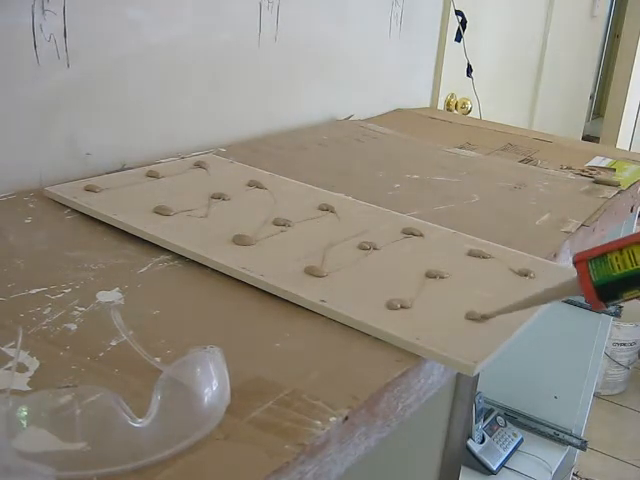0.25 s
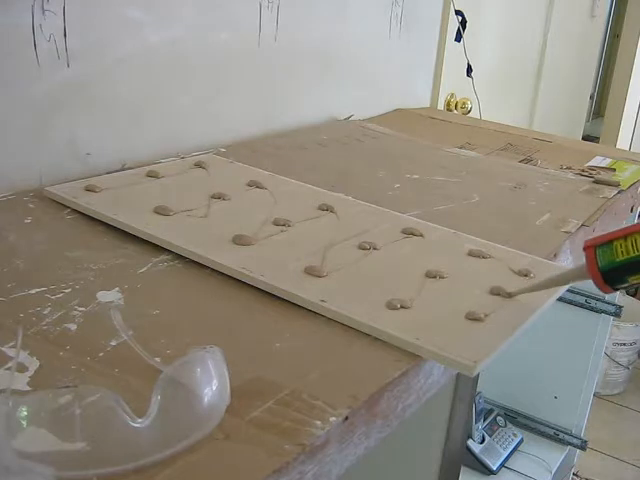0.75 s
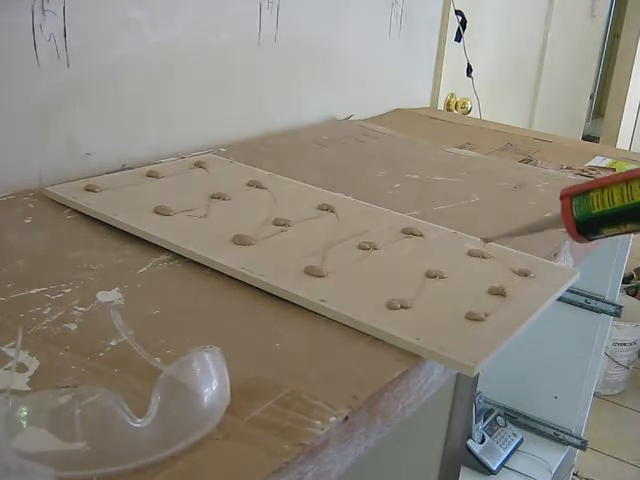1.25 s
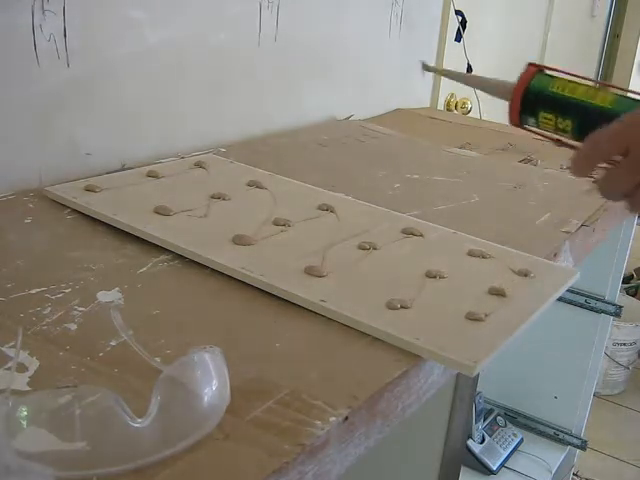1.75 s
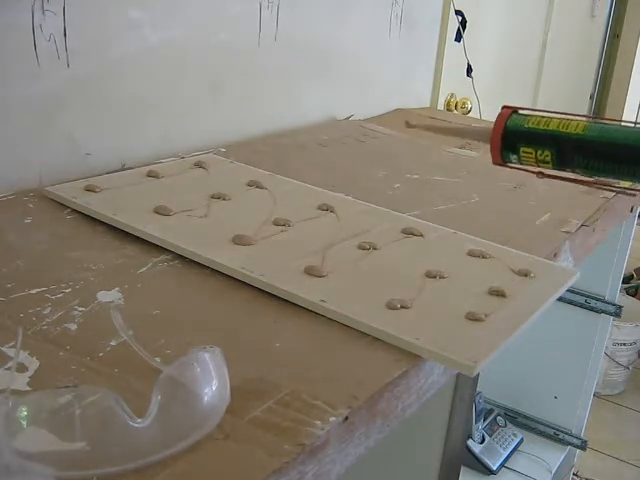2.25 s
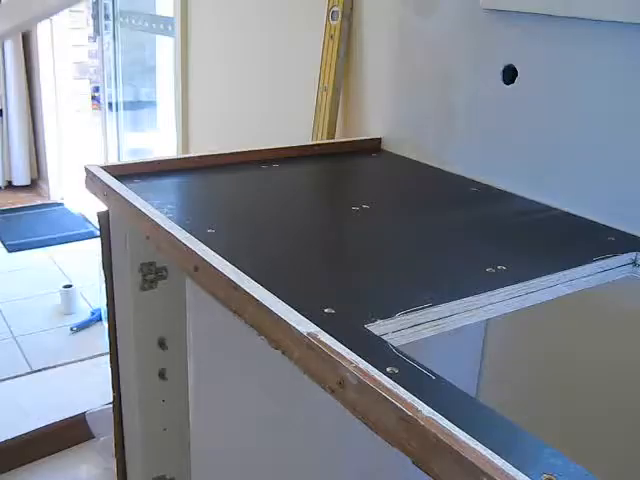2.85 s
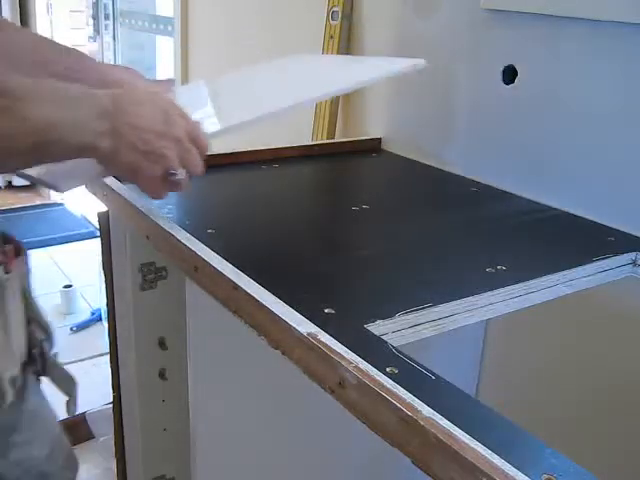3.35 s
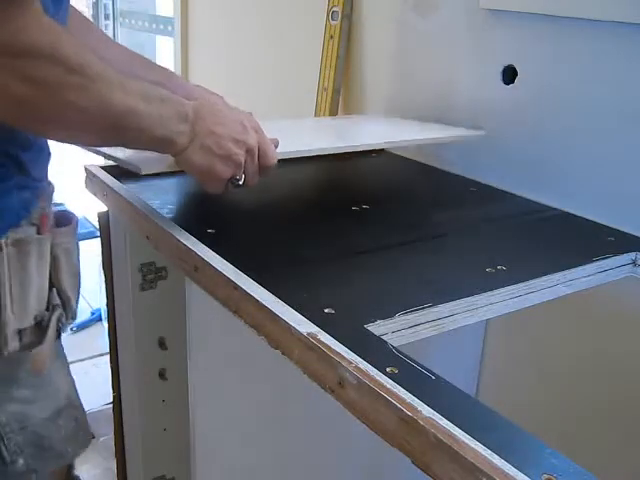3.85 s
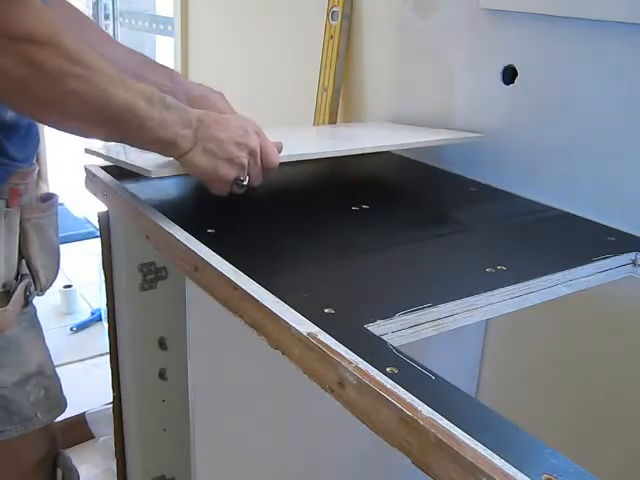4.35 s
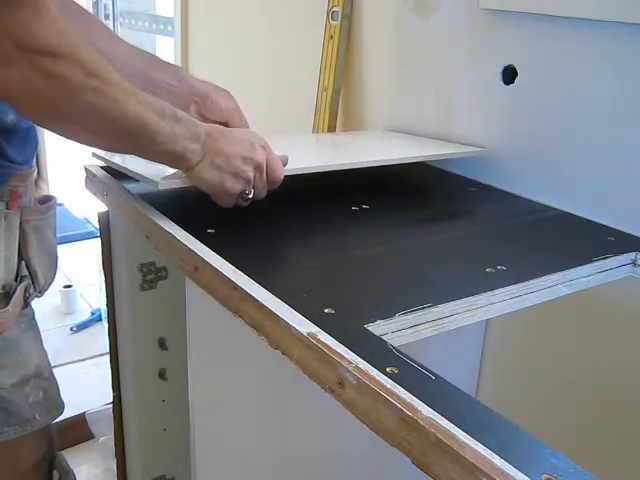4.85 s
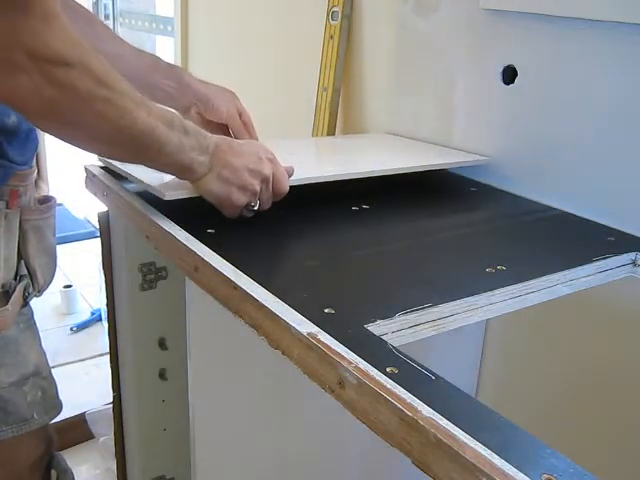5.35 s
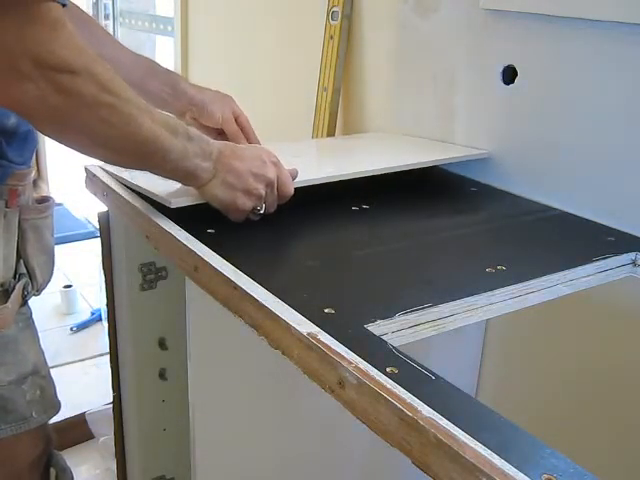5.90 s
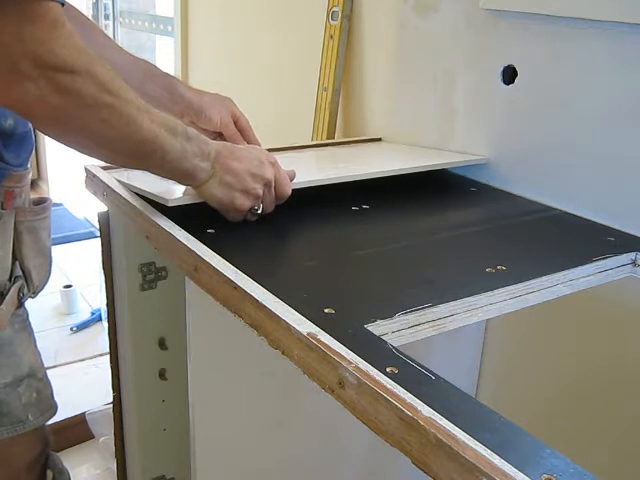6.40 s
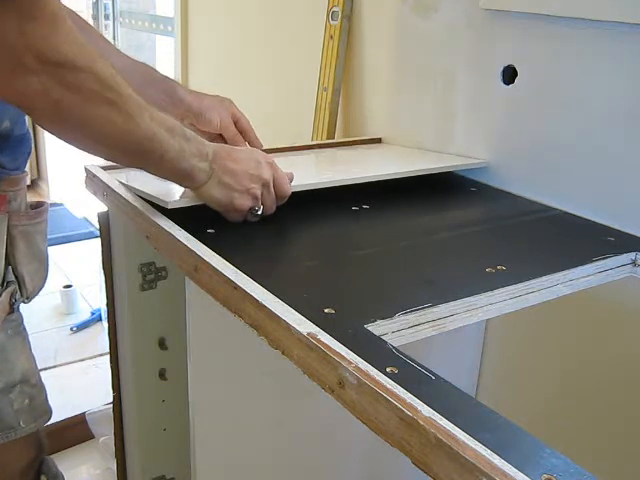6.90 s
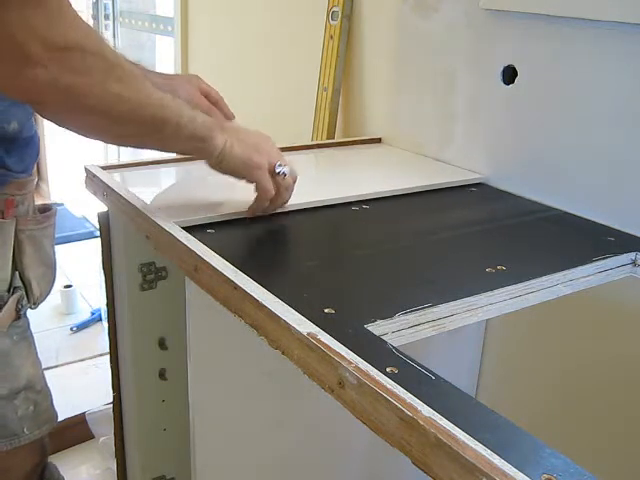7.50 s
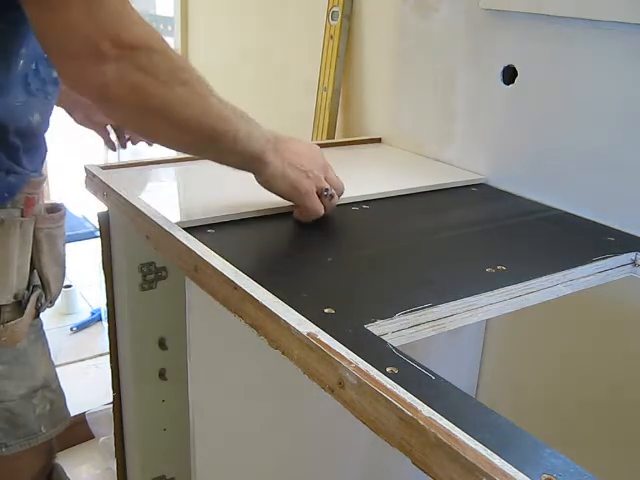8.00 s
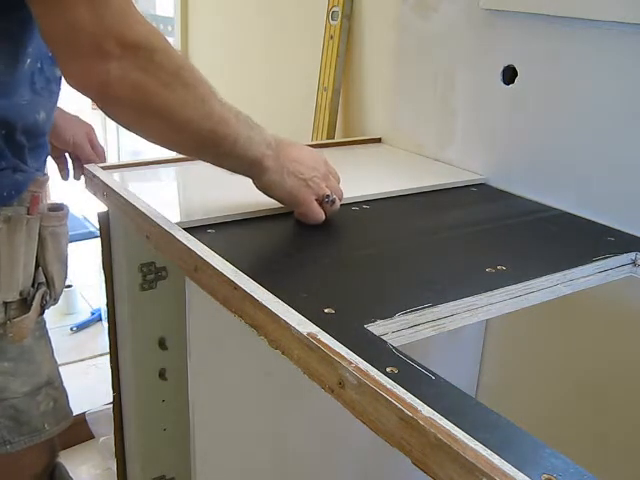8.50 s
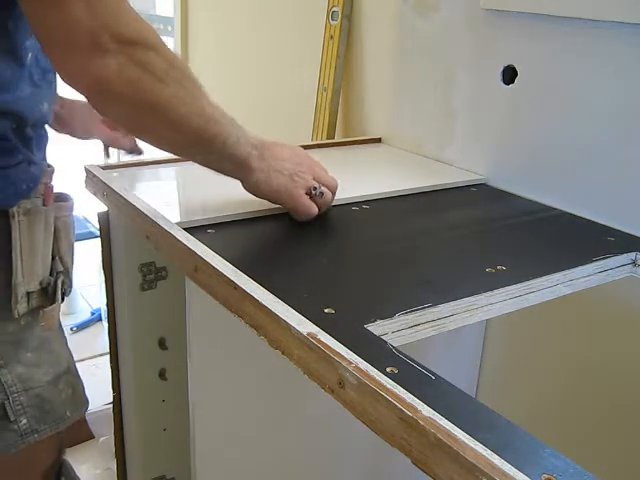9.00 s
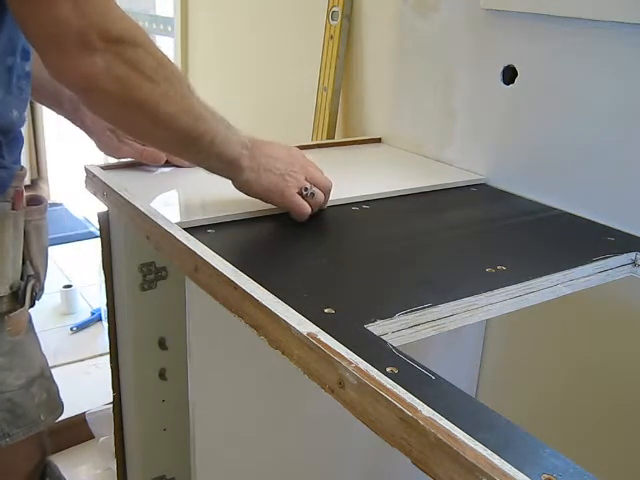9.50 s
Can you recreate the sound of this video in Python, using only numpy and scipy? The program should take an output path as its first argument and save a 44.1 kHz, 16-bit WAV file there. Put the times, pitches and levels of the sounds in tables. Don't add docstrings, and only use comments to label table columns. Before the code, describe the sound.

In a bare, lively room, a caulking gun gives crisp steel clicks, a plunger jump with a hollow tube ring, small rattles and a release click. Everything drops to silence briefly, then soft thuds and short gritty scrapes lead to loud hard tile knocks on a hollow cabinet, one last clack, and quiet hiss. A small noisy microphone, close, dull on top, with audible gain pumping.

```python
import sys
import numpy as np
from scipy import signal
from scipy.fft import rfft, irfft, next_fast_len
from scipy.io import wavfile

SR = 44100
rng = np.random.default_rng(int(sys.argv[2]) if len(sys.argv) > 2 else 0)


def unload_audio(sound):
    columns = np.transpose(np.atleast_2d(sound))
    steps = np.round(np.clip(columns, -1, 1) * 32767)
    wavfile.write(sys.argv[1], SR, steps.astype(np.int16))


def gain_from_db(level_db):
    decades = np.asarray(level_db, float) / 20
    return 10 ** decades


N = 429534

# (frequency [Hz], level [dB per Hz])
FLOOR_SPECTRUM = [(13, -51.5), (22, -16), (79, -4), (108, -10.5), (163, -4.5), (198, -7), (346, -7),
                  (440, -8.5), (1550, -16), (1880, -12), (2900, -11), (3520, -5.5), (4300, -9), (5990, -16),
                  (7090, -23.5), (9220, -71), (15600, -120)]
# (time [s], hold [s], depth [dB])
DUCKS = [
    (1.0, .2, 2.2),
    (1.28, .2, 4.5),
    (1.95, .05, 1.5),
    (2.33, .03, 5),
    (2.65, .12, 7.5),
    (4.05, .06, 1.5),
    (6.2, .55, 3),
]
# (time [s], hold [s], level [dB])
RUSTLES = [
    (3.096, 0.07, -53),
    (3.787, 0.048, -48.5),
    (6.021, .08, -65),
    (7.12, 0.38, -58),
]
# (before silence [dB], after silence [dB])
RUMBLE_DB = (-4.5, -2.5)
# (time [s], hold [s], level [dB], rise [dB/s], fall [dB/s])
LATE_HUM = (7.8, 1.0, -60, 20, 15)
# (start [s], end [s])
SILENCE = (2.452, 2.649)
# (frequency [Hz], t60 [s])
ROOM_DECAY = [(60, 0.51), (250, 0.49), (1000, 0.73), (3000, 0.33), (6000, 0.22)]
# (time [s], level [dB], length [s])
JOLTS = [
    (0.849, -33.5, 0.0006),
    (1.124, -32.5, 0.00084),
    (1.7245, -59, 0.003),
    (2.283, -42, 0.0026),
]
# (time [s], hold [s], level [dB], rise [dB/s], fall [dB/s])
RELEASE = (2.292, .030, -26, 4000, 1300)
# (frequency [Hz], width [Hz], level [dB])
PLATE = [(3420, 300, -2), (1900, 600, -22), (5000, 700, -16)]
# (time [s], peak [dB], steel pitch [Hz], steel ring under the snap [dB])
CLICKS = [(0.3639, -10.5, 2800, -18), (.850, -12.5, 3930, -12), (0.8553, -13, 4330, -23),
          (0.881, -34, 3240, -7), (1.0702, -21, 3900, -16), (1.1215, -8, 2370, -17),
          (1.269, -27, 1940, -10.5), (1.348, -22.5, 1850, -19), (1.3796, -20, 1850, -19),
          (1.495, -21.5, 1850, -17), (1.610, -28.5, 1500, -16.5), (1.704, -15.5, 2800, -28.5),
          (1.7069, -12.5, 2800, -20.5), (1.7244, -14.5, 1990, -10.5), (1.751, -22, 1900, -12.5),
          (2.2888, -13.5, 3570, -36)]
# (frequency [Hz], level [dB], t60 [s])
STEEL = [(1440, -17, .08), (1735, 3, 0.11), (1900, -6.5, 0.17), (1923, -0.5, 0.037), (1870, -9, 0.067),
         (1950, 0, .1), (2370, -11, 0.057), (2376, 4, 0.05), (2710, -15.5, 0.048), (2800, 13, 0.034),
         (2770, 9.5, 0.098), (3540, 10, 0.029), (3750, -10, 0.1), (3900, 0.5, 0.073), (4780, 5, .06),
         (4600, -13, 0.068)]
# (frequency [Hz], level [dB], t60 [s])
TUBE = [(436, -14, .15), (474, 0, .45), (494, -1, .2), (462, -9, .3)]
# (time [s], level [dB], pitch [Hz], t60 [s])
BUMPS = [
    (-.01, -42, 1085, .3),
    (-.01, -39, 1150, .3),
    (-.03, -47, 410, .3),
    (-.02, -45, 1327, .12),
    (-.02, -43, 60, .5),
    (.471, -39, 400, .12),
    (.471, -41, 480, .3),
    (.468, -43, 1000, .05),
    (1.706, -31, 440, .04),
]
# (time [s], hold [s], level [dB], rise [dB/s], fall [dB/s])
SQUEAK = (6.06, .085, -45, 500, 3000)
# (time [s], hold [s], level [dB], colour [octaves above 300 Hz], edge grit over body [dB])
DRAGS = [(3.705, .03, -21, 1.08, -8), (3.763, 0.0087, -27, 0.65, -11.5), (3.799, 0.0065, -26, .5, -23),
         (3.837, 0.012, -30, 1.4, -4), (3.882, 0.035, -34, 1.1, -2), (4.193, 0.016, -42.5, 1.7, 8),
         (4.333, 0.046, -49.5, 1.16, 11), (4.749, 0.013, -46.5, 1.4, -4), (4.91, 0.097, -47, 1.46, 6),
         (5.052, 0.12, -52.5, 1.7, 1.5), (5.284, .06, -50, 1.6, 3), (5.397, 0.066, -50, 1.5, 3),
         (6.957, 0.033, -55, 1.4, 11), (7.074, 0.052, -42.5, 1.2, 4), (7.162, 0.065, -49, 1.1, 6),
         (7.272, .012, -39, 1.8, 8.5)]
# (time [s], peak [dB], colour [octaves above 300 Hz], boom [dB])
THUDS = [(3.022, -31.5, 0, 4), (3.052, -26.5, 0.45, -3), (3.052, -24, 3.5, -23), (3.14, -30, 0.31, -3.5),
         (3.146, -30, 2.8, -18), (5.705, -41, -1.1, 12), (3.164, -28.5, 2, -3), (3.203, -32.5, 0.59, -4.5),
         (9.414, -48, -0.3, 12), (9.445, -52.5, -0.3, 15), (9.488, -58, 2, -1)]
# (time [s], peak [dB], colour [octaves above 300 Hz], crack [dB], chatter [s])
KNOCKS = [(2.971, -30.5, 3.55, -12.5, 0.075), (3.311, -34, 1.18, 7.5, 0.062),
          (3.435, -35, 0.81, -4.5, 0.023), (3.591, -36.5, 0.56, -5, 0.031), (3.681, -22.5, 1.33, -8, 0.009),
          (5.677, -21, 0.87, 0.5, 0.063), (5.834, -17, 0.6, -18.5, 0.023), (5.855, -26, 0.32, -16, 0.025),
          (5.888, -24, 0.41, -17, 0.025), (5.912, -32, 2.7, -5, 0.014), (6.151, -12.5, 1.29, 6.5, 0.036),
          (6.235, -14.5, 1.13, -11, 0.034), (6.357, -24.5, 0.7, 3.5, 0.055),
          (6.426, -18, 1.13, -7.5, 0.018), (6.468, -18, 1.53, 11, 0.0089), (6.587, -24, 0.84, 7.5, 0.035),
          (6.653, -36.5, 1.3, 13, 0.0098), (6.951, -34, 3.3, 3.5, 0.013), (7.301, -14.5, 1.3, -5, 0.012),
          (7.312, -18, 1.25, -12, 0.035), (7.335, -20.5, 1.03, -14.5, 0.031)]
# (frequency [Hz], level [dB], t60 [s])
TILE = [(314, -4.5, 0.11), (335.8, -4, 0.11), (399, 3, 0.033), (464, -1, 0.034), (562.4, -5, 0.048),
        (688, -9, 0.042), (775, -4.5, 0.017), (865, -5.5, 0.039), (932, -6, 0.039), (1048, 1, 0.028),
        (1177, -3, 0.028), (1356, 4, 0.016), (1580, 0, 0.033), (1757, 0.5, 0.019), (1995, -4.5, 0.073),
        (2042, -3, 0.02), (2334, 5, 0.026), (2615, -4.5, 0.058), (2935, 2.5, 0.026), (3483, -4.5, 0.051),
        (4030, 0, 0.029), (4715, 5.5, 0.0087), (5710, -1.5, 0.012)]
# (frequency [Hz], level [dB], t60 [s])
CABINET = [(41, -13.5, 0.74), (67.5, -11.5, 0.49), (81.4, -3, 0.12), (104, -7, 0.13), (126.4, -0.5, 0.13),
           (140, -1.5, 0.12), (188.5, -0.5, 0.17), (227, -2.5, 0.15), (274.7, -7.5, 0.098)]

HISS_DB, RUSTLE_DB_PER_S = -51.5, 61.5
DUCK_DB_PER_S, RECOVER_DB_PER_S = 40, 22
HUM_HZ, HUM_DB, HUM_FOLLOWS = 199.1, -57, 3.5
LATE_HUM_HZ = 80.8
SNAP_HZ, SNAP_FOLLOWS = 2930, 0.52
TUBE_DB, TUBE_DB_PER_OCTAVE = -50, -4.5
PLUNGER_JUMP_S, PLUNGER_TUBE_DB = 1.1215, -32.5
SQUEAK_HZ = 2890
DRAG_RISE_DB_PER_S, DRAG_FALL_DB_PER_S = 447, 252.5
HEAVY_DB, NARROW_DB, NARROW_GROWS, BOX_DB, BOX_FADES = -20.5, 8, 0.17, -10.5, 1
BOOM_DB, BOOM_DB_PER_OCTAVE2 = -9, -0.5
THUD_CRACK_DB, THUD_CRACK_DB_PER_OCTAVE, THUD_CHATTER_S = -10, 2, 0.019
PORT_HZ, OFFSET = 5600, .0027


def at_hz(points, hz):
    table = np.array(points)
    return np.interp(np.log(hz), np.log(table[:, 0]), table[:, 1])


def levels(s, hold_s, db, rise_db_per_s, fall_db_per_s, t):
    before = np.maximum(s - t, 0)
    after = np.maximum(t - s - hold_s, 0)
    return db - rise_db_per_s * before - fall_db_per_s * after


def rms_one(x):
    return x / np.sqrt(np.mean(x ** 2) + 1e-20)


def peak_one(x):
    return x / np.max(np.abs(x))


def cut(x, hz, kind, order=2):
    return signal.sosfilt(signal.butter(order, hz, kind, fs=SR, output="sos"), x)


def ring(x, modes, extra_db=0, damping=1):
    out = 0
    extra_db = extra_db + np.zeros(len(modes))
    for k, ((hz, db, t60), more_db) in enumerate(zip(modes, extra_db)):
        r = gain_from_db(-60 * damping / (t60 * SR))
        w = 2 * np.pi * hz / SR
        mode = signal.lfilter([0, np.sin(w)], [1, -2 * r * np.cos(w), r * r], x + 1e-18)
        out = out + (-1) ** k * gain_from_db(db + more_db) * mode
    return out


def wide(hz, width_hz, db):
    return hz, db, np.log(1000) / (np.pi * width_hz)


def grains(per_s, spread_db, size=N):
    draw = rng.random((3, size))
    happens = draw[0] < per_s / SR
    size_gain = gain_from_db(-spread_db * np.log(draw[1] + .04))
    return happens * size_gain * np.sign(draw[2] - .5)


def contact(chatter_s, per_s, share, size):
    t = np.arange(size) / SR
    x = share * grains(per_s, 3.6, size=size) * np.exp(-t / max(chatter_s, 1e-4))
    x[0] = 1
    return x


def colour(octaves, slope_db):
    return -slope_db * np.abs(np.log2(np.array(TILE)[:, 0] / 300) - octaves)


def add(out, x, s):
    at = round(s * SR)
    x = x[max(-at, 0):N - at]
    out[max(at, 0):max(at, 0) + len(x)] += x


def drone(hz, width_hz):
    return rms_one(ring(rng.standard_normal(N), [wide(hz, width_hz, 0)]))


def floor():
    size, t = next_fast_len(N), np.arange(N) / SR
    hz = np.maximum(np.arange(size // 2 + 1) * SR / size, 1)
    noise = irfft(rfft(rng.standard_normal(size)) * gain_from_db(at_hz(FLOOR_SPECTRUM, hz)), size)[:N]
    noise = noise / np.std(cut(noise, [4300, 6000], "band", order=6))
    low = cut(noise, 850, "low", order=1)
    duck_db = sum(np.maximum(levels(*row, DUCK_DB_PER_S, RECOVER_DB_PER_S, t), 0) for row in DUCKS)
    rustle = sum(gain_from_db(2 * levels(*row, RUSTLE_DB_PER_S, RUSTLE_DB_PER_S, t)) for row in RUSTLES)
    gain = np.sqrt(gain_from_db(2 * (HISS_DB - duck_db)) + rustle)
    first = t < SILENCE[0]
    hiss = gain * (noise + (gain_from_db(np.where(first, *RUMBLE_DB)) - 1) * low)
    hum = first * gain_from_db(HUM_DB - HUM_FOLLOWS * duck_db) * drone(HUM_HZ, 1.2)
    late_hum = gain_from_db(levels(*LATE_HUM, t)) * drone(LATE_HUM_HZ, 6.0)
    return hiss + hum + late_hum


def room(x):
    t, tail = np.arange(SR) / SR, 0
    for low in 40 * 2. ** np.arange(8):
        band = cut(rng.standard_normal(SR), [low, 2 * low], "band")
        tail = tail + band * gain_from_db(-60 * t / at_hz(ROOM_DECAY, np.sqrt(2) * low))
    tail = tail * np.clip((t - .003) / 0.0032, 0, 1)
    return signal.fftconvolve(x, tail / np.sqrt(np.sum(tail ** 2)))[:N]


def jolts():
    out = np.zeros(N)
    for s, db, length_s in JOLTS:
        t = np.arange(SR // 20) / SR / length_s
        add(out, -gain_from_db(db) * t * np.exp(1 - t), s)
    return out


def release():
    rattle = rms_one(ring(grains(1200, 0.64), [wide(*p) for p in PLATE]))
    return gain_from_db(levels(*RELEASE, np.arange(N) / SR)) * rattle


def bumps():
    out = np.zeros(N)
    for s, db, hz, t60 in BUMPS:
        hit = contact(0.022, 500, 0.56, size=SR // 2)
        add(out, gain_from_db(db) * peak_one(ring(hit, [(hz, 0, t60)])), s)
    return out


def gun():
    out, steel_hz = np.zeros(N), np.array(STEEL)[:, 0]
    for s, db, ring_hz, steel_db in CLICKS:
        hz = SNAP_HZ * (ring_hz / SNAP_HZ) ** SNAP_FOLLOWS
        tube_db = TUBE_DB + TUBE_DB_PER_OCTAVE * np.log2(ring_hz / 1850)
        if abs(s - PLUNGER_JUMP_S) < .01:
            tube_db = PLUNGER_TUBE_DB
        hit = contact(0.004, 1500, 0.3, size=SR // 2)
        snap = ring(hit, [wide(hz, 1100, 0), wide(1.6 * hz, 2200, -8)])
        snap = peak_one(cut(snap, .5 * hz, "high"))
        near_db = -35 * np.abs(np.log2(steel_hz / ring_hz))
        rattle = contact(.045, 900, 0.24, size=SR // 2)
        steel = peak_one(ring(rattle, STEEL, near_db, damping=1.4))
        tube = peak_one(ring(hit, TUBE))
        add(out, gain_from_db(db) * (snap + gain_from_db(steel_db) * steel) + gain_from_db(tube_db) * tube, s)
    return out


def squeak():
    tone = rms_one(ring(grains(3400, 6.2), [wide(SQUEAK_HZ, 90, 0), wide(4100, 150, -8)]))
    return gain_from_db(levels(*SQUEAK, np.arange(N) / SR)) * tone


def drags():
    size, lead_s = SR // 2, .1
    out, t = np.zeros(N), np.arange(size) / SR
    for s, hold_s, db, octaves, grit_db in DRAGS:
        lighter_db = HEAVY_DB - db
        grit = grains(1500, 3.2, size=size)
        box = rms_one(ring(grains(440, 11.0, size=size), CABINET, damping=1.5))
        body_db = colour(octaves, NARROW_DB + NARROW_GROWS * lighter_db)
        body = rms_one(cut(ring(grit, TILE, body_db, damping=0.72), 1400, "low"))
        edge = ring(grit, TILE, rng.normal(0, 2.5, len(TILE)), damping=.7)
        edge = rms_one(cut(edge, 1700, "high", order=4))
        stroke = gain_from_db(levels(lead_s, hold_s, db - 4, DRAG_RISE_DB_PER_S, DRAG_FALL_DB_PER_S, t))
        sound = gain_from_db(BOX_DB - BOX_FADES * lighter_db) * box + body + gain_from_db(grit_db) * edge
        add(out, stroke * sound, s - lead_s)
    return out


def knocks():
    out, size = np.zeros(N), SR // 3
    soft = [(s, db, o, boom_db, THUD_CRACK_DB + THUD_CRACK_DB_PER_OCTAVE * o, THUD_CHATTER_S)
            for s, db, o, boom_db in THUDS]
    hard = [(s, db, o, BOOM_DB + BOOM_DB_PER_OCTAVE2 * o ** 2, *rest) for s, db, o, *rest in KNOCKS]
    crack_modes = [wide(1200, 1100, 0), wide(2400, 1400, -4.0), wide(4600, 2900, -10.0)]
    for s, db, octaves, boom_db, crack_db, chatter_s in soft + hard:
        hit = contact(chatter_s, 900, 0.21, size=size)
        edge = contact(chatter_s, 990, 0.085, size=size)
        tile_db = rng.normal(0, 2, len(TILE))
        box_db = rng.normal(0, 2, len(CABINET))
        deep_db = 3.3 * octaves * np.log2(np.array(CABINET)[:, 0] / 220)
        body = peak_one(ring(hit, TILE, colour(octaves, 12.2) + tile_db, damping=1.6))
        boom = peak_one(ring(cut(hit, 280, "low"), CABINET, box_db + deep_db))
        crack = peak_one(ring(edge, crack_modes))
        add(out, gain_from_db(db) * (body + gain_from_db(boom_db) * boom + gain_from_db(crack_db + 1.5) * crack), s)
    return out


def scene():
    steel, rattle = gun() + bumps(), release()
    tile, grit = knocks(), drags() + squeak()
    wet = room(gain_from_db(-12) * steel + gain_from_db(-34.5) * rattle + gain_from_db(-11) * tile + gain_from_db(-11) * grit)
    heard = cut(steel + rattle + tile + grit + wet, PORT_HZ, "low", order=4)
    return (heard + jolts() + floor())[None]


def top_cut(x):
    return signal.sosfilt(signal.butter(12, 7240, fs=SR, output="sos"), x)


def record(dry):
    x = dry - .22 * dry ** 2
    x = cut(x, 5756, "low", order=12) + OFFSET
    t = np.arange(N) / SR
    audible = (t < SILENCE[0]) | (t > SILENCE[1])
    return top_cut(x * audible)


dry = scene()
out = record(dry)
unload_audio(out)
```